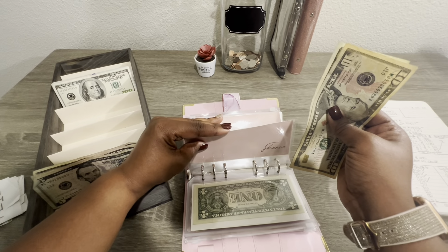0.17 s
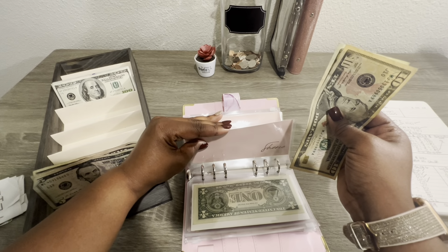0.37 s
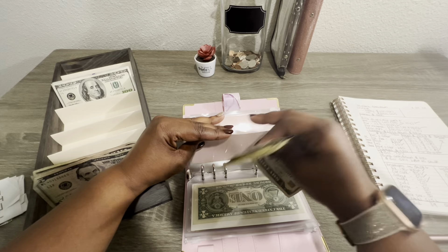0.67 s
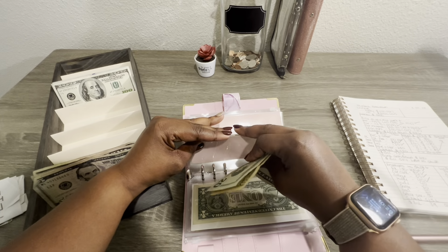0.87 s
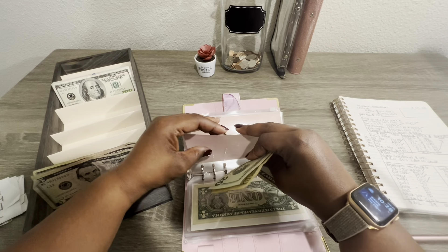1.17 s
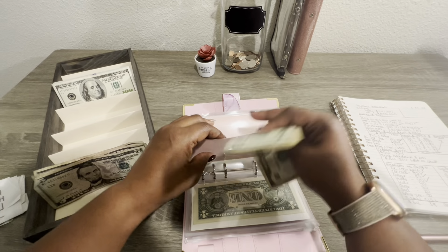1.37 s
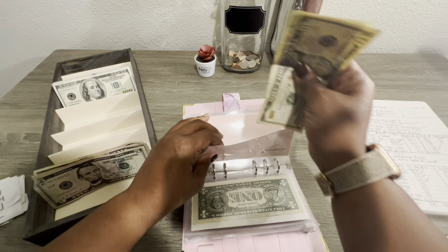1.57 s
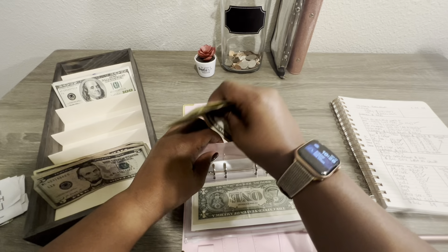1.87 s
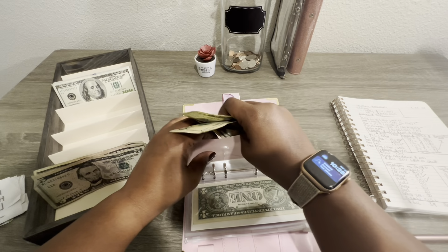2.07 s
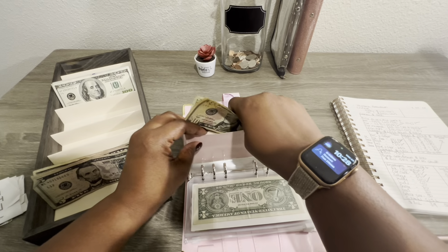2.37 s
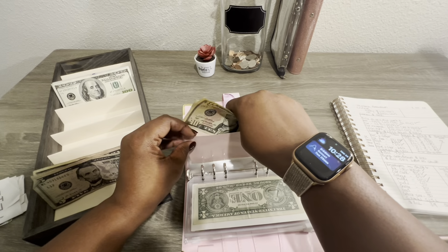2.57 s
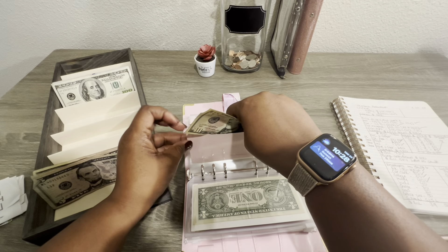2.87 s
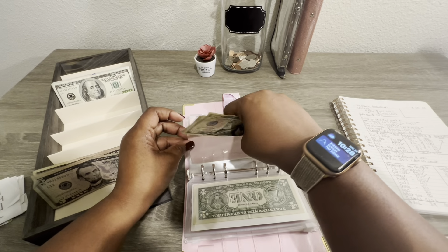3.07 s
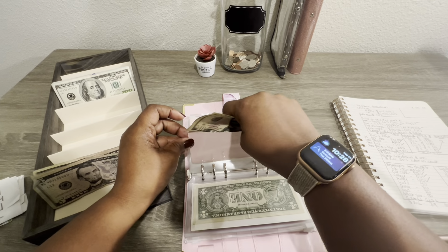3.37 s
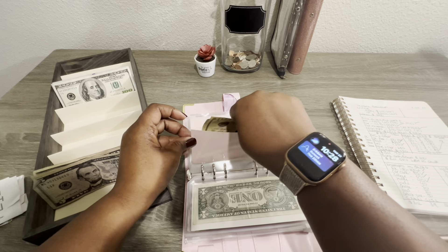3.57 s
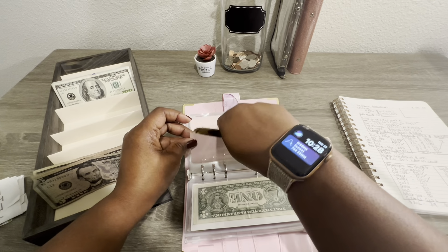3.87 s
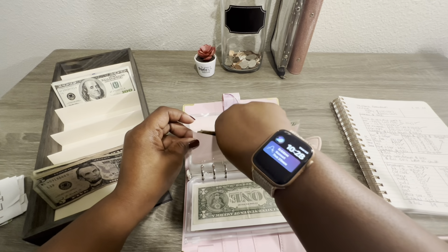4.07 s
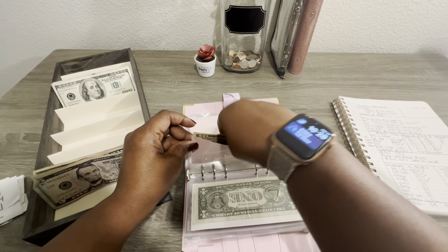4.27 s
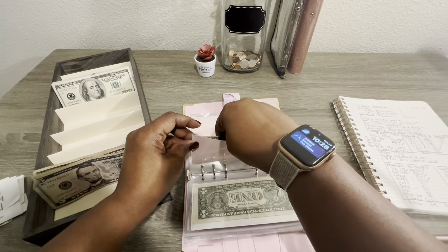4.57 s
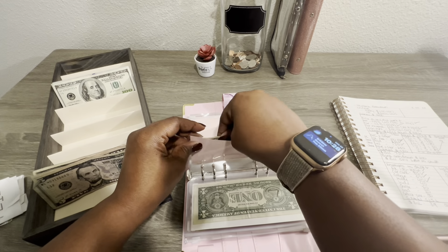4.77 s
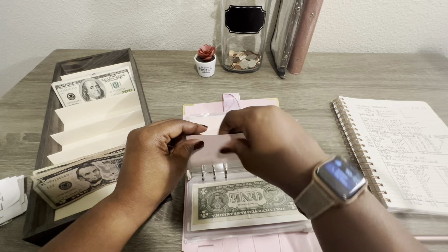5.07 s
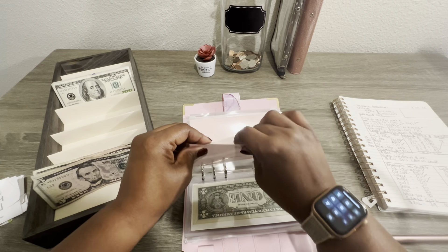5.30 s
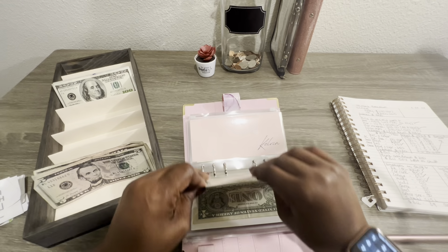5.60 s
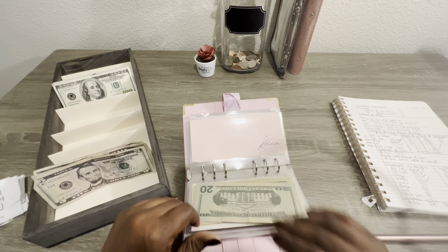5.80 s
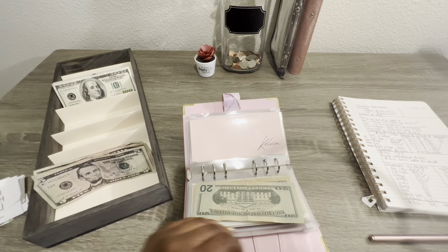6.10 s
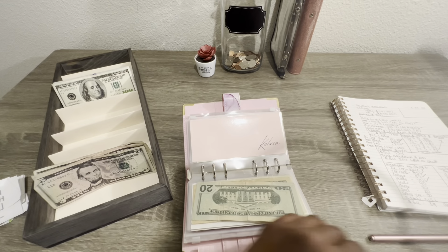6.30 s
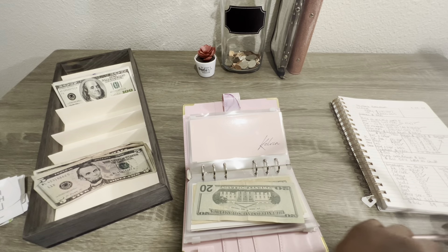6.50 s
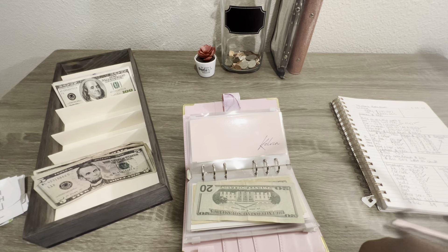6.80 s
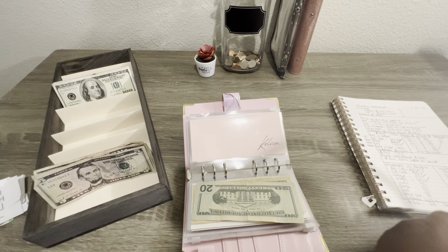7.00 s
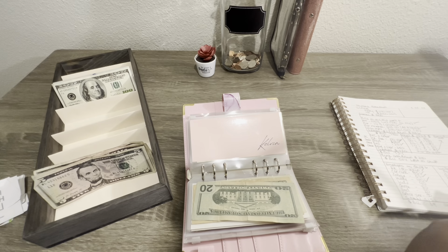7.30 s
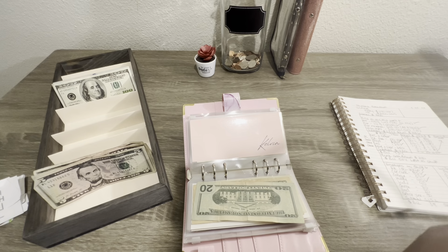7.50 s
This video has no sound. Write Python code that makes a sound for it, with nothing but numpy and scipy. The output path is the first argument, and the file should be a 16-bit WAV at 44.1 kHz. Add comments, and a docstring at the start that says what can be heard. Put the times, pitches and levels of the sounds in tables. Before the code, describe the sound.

A low, slightly wavering hum and soft rush of air, the hiss brighter on the left, continue throughout a small, fairly dry room. Right at the start paper scrapes briefly. At about 0.5 s a sharp, hollow knock on the binder lands with a soft desk thump; a lighter rub follows at 0.8 s and a cluster of muted bumps at 1.3 s. From 1.9 to 5.4 s banknotes are pushed into a plastic sleeve: close, uneven strokes of dry hiss, fine crackle, crisp creases and little clicks, with stronger snaps around 4.25 s. At 5.4 to 5.8 s come soft thumps and a short papery slide, then gentle brushing around 6.1 s. At 6.6 to 6.85 s a pen taps and rattles rapidly on the wood with a dull thud beneath. The hum remains, broken by a small tick and rub at 7.4 s.

```python
"""First comes a brief scrape of paper over a low hum and a steady rush of air, brighter at the left port.
Banknotes are slid into a plastic envelope of a ring binder on a wooden desk, close under a two-port microphone.
Friction is banded noise with grains of crackle; creases are bursts of noise; knocks and pen taps strike
damped modes, and landings strike those of the desk. Sines make the appliance's hum, shaped noise the air."""
import sys
import numpy as np
from scipy import signal
from scipy.fft import rfft, irfft, next_fast_len
from scipy.io import wavfile

SR = 44100
rng = np.random.default_rng(int(sys.argv[2]) if len(sys.argv) > 2 else 0)


def waveform_to_disk(signal):
    """Save audio, clipped to [-1, 1], as 16-bit WAV at the path in sys.argv[1]."""
    frames = np.transpose(np.atleast_2d(signal))
    scaled = np.clip(frames, -1, 1) * 32767
    samples = np.round(scaled).astype(np.int16)
    wavfile.write(sys.argv[1], SR, samples)


N = 337359   # samples
SIZE = next_fast_len(N + SR // 2)   # transform length, with space for the room tail
HZ = np.arange(SIZE // 2 + 1) * SR / SIZE

# Spectrum of the air in the room: (frequency [Hz], left level [dB per Hz], right level [dB per Hz],
# shared fraction of power [0-1], lead of the right port [rad])
AIR_SPECTRUM = [(30.2, -90, -90, 0.7, 2), (50.3, -86, -89, 1, 0.5), (89, -78.5, -98, 0.97, 0),
                (135.6, -77.5, -72.5, 0.97, 0.37), (187.4, -80.5, -87.5, 1, 1),
                (244, -72.5, -70.5, 0.57, 1), (339.5, -79, -77.5, 0.63, 1), (553, -92, -91, 0.82, 3.5),
                (1040, -92, -94.5, 0.63, 3.5), (1914, -90.5, -101, 0.63, 0.5), (2105, -106, -107, 0.6, 8.5),
                (3930, -105, -115, 0, 13.5), (6900, -104, -118, 0.8, -10), (9300, -116, -113, 0.6, 3.5),
                (11200, -132, -128, .8, 9.5), (15500, -136, -136, 1, 0)]
# Air resonances: (frequency [Hz], width [Hz], left level [dB], right level [dB])
AIR_RESONANCES = [(1610, 333, -60.5, -103), (7290, 700, -68, -102)]
# Appliance tones: (frequency [Hz], left level [dB], right level [dB], lead of the right port [rad],
# spread of the level's wavering [dB])
HUM_TONES = [(120.2, -59, -60, .2, 2.5), (261, -70, -55, 1.5, 2), (1184, -74, -76, 2.0, 1.5)]
# Level points of a fluctuating low tone near 59 Hz, one arbitrary course, midway between the ports:
# (time [s], level [dB])
LOW_TONE_LEVELS = [(0.0, -59), (0.04, -58), (1.53, -73), (1.7, -64), (2.75, -57.5), (4.05, -80),
                   (4.17, -63), (5.26, -59), (6.35, -62.5), (6.39, -71), (7.63, -55), (7.65, -57)]
# Wrists and binder landing softly on the desk: (time [s], level before the thud gain [dB])
LANDINGS = [(0.538, -37), (1.324, -38), (5.45, -38.5), (5.834, -43.5), (6.129, -51), (6.597, -33.5),
            (6.724, -48)]
# Modes of the desk: (frequency [Hz], level [dB], decay time t60 [s])
DESK_MODES = [(83, -1.5, 0.23), (120, -3, 0.88), (170, -6, 0.18)]
# Modes of the binder, struck freely: (frequency [Hz], level [dB], decay time t60 [s])
BINDER_MODES = [(300, -3, 0.046), (446, -6, 0.019), (541, -3.5, 0.055), (650, -1, 0.03), (848, -7.5, 0.023),
                (1002, -3, 0.027), (1168, -1, 0.031), (1490, -9.5, 0.048), (2300, -11, 0.0054),
                (1750, -16, 0.052), (2780, -8, 0.017), (3060, -14, 0.041)]
# The pen is set down and rattles on the desk: (time [s], level [dB])
PEN_BLOWS = [(6.581, -44.5), (6.5879, -38), (6.599, -38), (6.604, -49), (6.645, -50), (6.66, -48.5),
             (6.692, -48), (6.703, -50), (6.717, -39.5), (6.7225, -41), (6.728, -44), (6.74, -48),
             (6.754, -45), (6.768, -42.5), (6.776, -43), (6.789, -44), (6.808, -51), (6.857, -52)]
# Modes of the pen: (frequency [Hz], level [dB], decay time t60 [s])
PEN_MODES = [(314, -1.5, 0.043), (440, -2.5, 0.049), (610, -12, 0.028), (1070, -2, 0.053), (1182, -6, 0.05),
             (1520, -5, 0.05), (1766, -7.5, 0.039), (2070, -15, 0.032), (2530, -19.5, 0.035),
             (3410, -6, .035), (4380, -26, .03), (5300, -24, .035)]
# Short coloured puffs of noise, narrow or broad, from rubs, knocks and the pen:
# (start [s], length [s], frequency [Hz], width [Hz], level [dB])
PUFFS = [(0.536, 0.0073, 1260, 500, -26.5), (0.535, 0.0088, 3070, 350, -32.5),
         (0.5356, 0.0041, 6850, 1200, -49), (0.572, 0.059, 1255, 150, -49.5),
         (0.639, 0.0069, 5470, 1600, -49), (1.295, 0.0072, 1440, 400, -54), (1.322, .012, 574, 200, -39),
         (1.323, 0.0093, 990, 200, -47), (2.615, .006, 5500, 2500, -55), (2.857, .01, 2300, 300, -54),
         (4.244, .006, 2840, 400, -41), (4.039, 0.055, 2500, 900, -59), (4.44, .04, 2600, 900, -63),
         (4.611, 0.0046, 2500, 1200, -53), (6.077, 0.096, 4530, 1400, -59), (1.326, 0.0089, 2680, 300, -51),
         (3.09, .025, 6050, 250, -62), (3.143, 0.01, 6100, 400, -57.5), (3.159, .012, 2230, 200, -51.5),
         (3.291, 0.0063, 6160, 400, -49.5), (3.289, .008, 2530, 300, -49.5), (3.31, .02, 1490, 200, -52),
         (3.326, .01, 2430, 300, -55), (3.341, .01, 2130, 350, -52), (4.898, 0.014, 2800, 300, -55),
         (4.978, 0.0088, 2370, 250, -51), (5.295, 0.013, 2500, 250, -61), (5.329, .012, 3200, 400, -55),
         (5.396, 0.013, 1070, 200, -45), (6.063, 0.01, 5000, 3500, -53), (6.601, 0.007, 1520, 250, -42),
         (6.722, .015, 5470, 400, -71), (6.753, 0.035, 5320, 120, -65), (6.786, .01, 5300, 200, -60),
         (6.745, .015, 3400, 200, -60), (6.722, 0.051, 9300, 500, -70), (7.3775, 0.0061, 9400, 1500, -54)]
# Creases and knocks: (time [s], crack level before its gain and band-pass [dB], crisp top re crack [dB],
# knock on the binder [dB], hardness of the knock [dB per octave])
CREASES = [(0.013, -50, 4, -55, -1), (.515, -55, -8, -44.5, -12), (.566, -56, -10, -40, -7.5),
           (0.5358, -29, -4, -21, 0.5), (.538, -60, -10, -27, -9), (0.639, -51, 4.5, -48, 2.5),
           (0.8004, -37, -7, -42, -1), (0.976, -49, -25.5, -59, 8.5), (1.095, -44.5, -1, -50, -7),
           (1.298, -43.5, -10, -53, -6), (1.304, -62, -11, -45, -9), (1.3222, -40, -7, -35.5, -6),
           (1.333, -63, -12, -37, -4), (1.345, -60, -12, -43, -1), (1.3593, -59, -20, -60, 1),
           (1.461, -47, -5, -44, -1), (1.9435, -40.5, 1, -38, -5.5), (2.1007, -34, -30, -32.5, -3.5),
           (2.198, -47, -7, -46, -7), (2.4174, -44, 10.5, -42, -5), (2.57, -52, -21, -43, -5),
           (2.616, -54.5, 14, -67, -2), (2.685, -37.5, -16, -41.5, 2.5), (2.7395, -43, -4, -47, 3),
           (2.762, -52, -10, -55, 3), (2.8584, -46.5, -1, -50, 2.5), (3.0407, -42.5, -3, -46, 0),
           (3.044, -55, -8, -43, -3), (3.118, -62, -4, -44, -7), (3.166, -48, -4, -43, -4),
           (3.2735, -48, -15, -40.5, -7), (3.2941, -43, -8, -42.5, 1.5), (3.382, -52, 0, -39, -2),
           (3.392, -42, 1, -41, 1), (3.4235, -60, -9.5, -43, 0), (3.857, -48, -19, -67, -17),
           (3.991, -62.5, -16, -58, -12), (4.2466, -34, -20, -48, 4), (4.2734, -31, -14, -49, 4),
           (4.3006, -41.5, 4, -49, -10), (4.6112, -53, -30, -48.5, 2), (4.6546, -39.5, -15, -49.5, -1),
           (4.677, -50.5, 6.5, -57, 0), (4.899, -48, -8, -57, 6), (4.9785, -39, -6, -54, 3),
           (5.2183, -41, -23, -50, -11), (5.3045, -53, -22, -57, -2), (5.394, -44, -8, -45, 1),
           (5.436, -48, -13, -41.5, -4), (5.5175, -50, -12, -65, 4), (5.7282, -45, 3.5, -56, 5.5),
           (5.775, -40, 0, -63, -0.5), (6.061, -50, -4, -68, 0.1), (6.582, -51, -13.5, -48, 1.5),
           (6.596, -44, -15, -48, 3.5), (6.714, -59, -7, -49, 2), (7.378, -44, -5, -54.5, 4),
           (7.383, -53, -2, -66, 0)]
# Strokes of paper on plastic, of hands on the binder and, from 6.6 s, of the pen; levels before the layer gains:
# (peak time [s], swell [s per 10 dB], fade [s per 10 dB], mean hiss level [dB], upper re lower hiss [dB],
# crisp top re mean hiss [dB], low binder modes [dB], high binder modes [dB])
RUB_STROKES = [(0.015, -0.5, -0.06, -55.5, 25, -16, -58, -61),
               (0.534, -0.16, 0.11, -50.5, 5, -12, -55, -54), (.58, 0.08, 0.11, -64, -5, -23, -58, -53),
               (0.799, -0.11, 0.01, -54.5, 10, -19, -59, -56),
               (.97, 0.18, -0.08, -60.5, 0, -23, -59, -59.5), (1.11, 0.8, 1.2, -70, 5, -18, -63, -70),
               (1.33, 0.08, 0.13, -58.5, -1, -13, -55, -58), (1.468, 0, 0.02, -54, -4, -9, -53, -60),
               (1.52, -0.6, -0.3, -65.5, 12, -12, -76, -70), (1.88, 0.005, 0.3, -62, -3, -3, -58, -65),
               (1.95, 0.04, 0.17, -54, 6, -4, -50.5, -57), (2.05, 0.06, 0.16, -56, 10, -1.5, -70, -70),
               (2.11, 0.03, .15, -53.5, 1, -4.5, -60, -57.5),
               (2.25, 0.04, 0.12, -61.5, -0.5, -3.5, -54, -60),
               (2.35, 0.03, 0.24, -61, -3, -9.5, -63, -62.5), (2.43, 0.14, 0.2, -66, 0, 2.5, -57, -65),
               (2.625, 0.005, 0.005, -72, 1, -1.5, -54, -66), (2.68, 0.07, 0.14, -61, 3, -8, -55, -60),
               (2.754, -0.04, 0.03, -51.5, -2, -6, -51.5, -53), (2.87, -0.26, 0, -60, -2, -12, -63, -65),
               (3.04, 0.06, 0.3, -59, 1, -9, -53.5, -59), (3.16, 0.035, 0.02, -50.5, -2, -5.5, -56, -56),
               (3.21, .04, 0.02, -60, -10, -10, -58, -57), (3.298, 0.012, 0.15, -50.5, -1, -8, -49, -52),
               (3.395, 0.03, 0.12, -52.5, 3.5, -4.5, -52, -55),
               (3.52, 0.05, 0.4, -61.5, -2.5, -6.5, -60, -63.5),
               (3.68, 0.05, 0.1, -58, 0, -8.5, -55, -59.5), (3.752, 0.08, 0.03, -59, -2, -9, -53.5, -57),
               (3.885, 0.05, .05, -55, -1, -10, -55, -61), (3.93, 0.1, 0.035, -55.5, 4, -11, -54.5, -62),
               (4.08, .065, 0.1, -53, -5, -8.5, -53.5, -52.5),
               (4.285, 0.005, 0.03, -51.5, 4, -13, -58, -57.5), (4.36, 0.2, 0.06, -56, 0, -9, -58, -61),
               (4.445, 0.04, 0.16, -56, -3, -8, -55.5, -56), (4.67, 0.01, 0.15, -58.5, -1.5, -7, -70, -65),
               (4.82, 0.06, 0.38, -60.5, -7.5, -12, -65.5, -61.5),
               (4.9, 0.02, 0.07, -57.5, 0, -7.5, -59, -67), (4.72, .03, .05, -60, -3, -10, -62, -58),
               (4.977, 0.045, 0.03, -52, 0, -7, -54.5, -57), (5.08, 0.05, .04, -58, 5, -6, -60, -65),
               (5.15, 0.24, 0.06, -62, 5, -4, -58.5, -61), (5.22, .015, 0.03, -53.5, -5, -18, -63, -52),
               (5.32, .02, 0.03, -55, -2, -9, -53, -56.5), (5.4, 0.07, .015, -54, 4, -8, -62, -59),
               (5.44, 0.13, 0.02, -60, 5, -12, -62, -58), (5.52, 0.1, 0.1, -62, 3, -10, -74, -62),
               (5.72, 0.06, 0.11, -64.5, 5, -5, -78, -64), (5.779, 0.07, 0.07, -56, 3, -12, -64, -54),
               (5.92, 0.12, 0.14, -66, 10, -21, -74, -73), (6.063, 0.004, 0.17, -58.5, 6, -19, -70, -62),
               (6.35, 0.17, -0.19, -62, 3, -27, -74, -63), (6.6, 0.04, 0.18, -64, -1, -21, -68.5, -52),
               (6.645, 0.04, 0.23, -68, -4, -25, -58, -56.5), (6.721, 0.0252, 0.03, -62, -4, -6, -49, -43),
               (6.77, 0.18, 0.03, -56, -3, -19, -59, -55), (7.04, 0, 1, -75, -2, -8.5, -80, -71),
               (7.38, -0.12, 0.04, -62, 0, -12, -80.5, -60.5)]
# Hands at rest, one level [dB] each: lower hiss, upper hiss, crisp top, low and high binder modes
REST_LEVELS = [-89, -92, -104, -66, -68.5]
# Hands as the two ports hear them, before the right port's gain: (frequency [Hz], left level [dB],
# right level [dB], shared fraction of power [0-1], lead of the right port [rad])
HAND_TRANSFER = [(98, -3.5, -8, 0.8, -0.5), (356, 3.5, 4, 0.5, 0.85), (720, -1.5, -2, 0.17, 0),
                 (1400, 3, -1.5, 0.26, -1), (2460, 2, 0, 0.8, -1.5), (3730, -3, -7, 0.12, -3.5),
                 (6500, 5, -5.5, 0.03, 1), (8680, 3, 4, 0.12, 0), (10160, 0.5, 0.5, 0.96, 3),
                 (12600, 0.5, -1.5, 1, 7.5), (15500, -4.5, -5, 1, 12.5)]

LOW_TONE_HZ, LOW_TONE_LEAD_RAD = 59, -.3   # the right port leads by this phase
LOW_TONE_LEFT_DB = 2.5   # left above and right below the tabled level
ROOM_T60_S, ROOM_DB = .25, -20
PUFF_EDGE_S, PUFF_FALL_DB = 0.00083, -9   # rise time, and level one length after the start
CRACK_T60_S = 0.033
TICK_DB, TICK_SAMPLES = 3, 30   # the first instant of a crack is sharper than its tail
CRINKLES_PER_S, CRINKLE_CYCLES = 250, 45   # median rate; cycles until a facet has decayed by 60 dB
CRINKLE_DB = -10.5   # re the mean of the lower and upper hiss levels
CLUMP_DB, CLUMPS_PER_S = 4, 40   # spread and drift rate of the density of grains and crinkles
GRAINS_PER_S, GRAIN_SPREAD_DB, GRAIN_DB = 900, 1.5, -4.5   # median rate, mean excess size, level re friction
FLUTTER_DB, FLUTTER_PER_S = 1.5, 60
PATCHY_DB = 0.4   # lower and upper hiss flicker apart
TOP_STEEPER, BINDER_STEEPER = 1.62, 1   # slope of swell and fade in dB, relative to the hiss
STOPBAND_HZ = 16377


def from_db(db):
    """Level and amplitude: 20 dB is a factor of ten."""
    return 10 ** (np.asarray(db) / 20)


def rms_one(x):
    """Normalization: division by the root mean square gives unit power."""
    return x / np.sqrt(np.mean(x ** 2) + 1e-20)


def drift(rate):
    """Slow random fluctuation: noise twice through a one-pole low-pass at rate [Hz] has spread 1."""
    pole = np.exp(-80 * np.pi * rate / SR)   # one step spans 40 samples
    noise = rng.standard_normal(N // 40 + 2002)
    slow = signal.lfilter([1], [1, -2 * pole, pole * pole], noise)[2000:]
    return np.interp(np.arange(N) / 40, np.arange(len(slow)), rms_one(slow))


def band(x, low_hz, high_hz):
    """Band-pass filtering: only frequencies between two edges pass freely."""
    return signal.sosfilt(signal.butter(2, [low_hz, high_hz], "band", fs=SR, output="sos"), x)


def mode(x, hz, t60):
    """Damped resonance: a unit click excites a decaying sine of initial height 1."""
    r = from_db(-60 / (t60 * SR))
    w = 2 * np.pi * hz / SR
    return signal.lfilter([0, np.sin(w)], [1, -2 * r * np.cos(w), r * r], x)


def ring(times, levels_db, tilts_db, modes, contact_s):
    """Modal excitation: each blow makes three uneven contacts; a harder one favours the high modes."""
    out = np.zeros(N)
    at = np.round(times * SR).astype(int)
    chance_db = rng.normal(0, 1.8, (len(at), len(modes), 3))
    for k, (hz, level_db, t60) in enumerate(modes):
        blows = np.full(N, 1e-18)   # tiny offset keeps the filter out of vanishing numbers
        tilt_db = tilts_db * np.log2(hz / 600)
        for j in range(3):
            size_db = levels_db + level_db + tilt_db - 9.1 * j + chance_db[:, k, j]
            blows[at + round(j * contact_s * SR)] += from_db(size_db)
        out += (-1) ** k * mode(blows, hz, t60)   # neighbouring modes start in opposite phase
    return out


def ports(shared, own, table):
    """Partial coherence: both ports hear a shared sound, the right phase-shifted, plus a part of its own each."""
    hz, *columns = np.transpose(table)
    left_db, right_db, alike, lead = [np.interp(np.log(HZ + 1), np.log(hz), c) for c in columns]
    alike = np.clip(alike, 0, 1)
    both = rfft(shared, SIZE) * np.array([np.ones(len(HZ)), np.exp(1j * lead)])
    mix = np.sqrt(alike) * both + np.sqrt(1 - alike) * rfft(own, SIZE)
    return irfft(mix * from_db([left_db, right_db]), SIZE)[:, :N]


def air_rush():
    """Broadband noise and resonance: shaped white noise gains two bands of raised level."""
    white = rng.standard_normal((3, N)) * np.sqrt(SR / 2)   # unit power per Hz
    out = ports(white[0], white[1:], AIR_SPECTRUM)
    for hz, width_hz, left_db, right_db in AIR_RESONANCES:
        rush = rms_one(band(rng.standard_normal(N), hz - width_hz / 2, hz + width_hz / 2))
        out += rush * from_db([[left_db], [right_db]])
    return out


def hum_tone(hz, lead, wander_hz):
    """Steady oscillation: a sine of unit power whose phase wanders, with a phase lead at the right port."""
    phase = 2 * np.pi * hz * np.arange(N) / SR + .5 * drift(wander_hz)
    return np.sqrt(2) * np.sin(phase + np.array([[0], [lead]]))


def appliance_hum():
    """Superposition of tones: the sines waver in level by chance, a low one follows its level points."""
    out = np.zeros((2, N))
    for hz, left_db, right_db, lead, waver_db in HUM_TONES:
        level_db = np.array([[left_db], [right_db]]) + waver_db * drift(2.0)
        out += hum_tone(hz, lead, 0.76) * from_db(level_db)
    low_db = np.interp(np.arange(N) / SR, *np.transpose(LOW_TONE_LEVELS))
    balance_db = LOW_TONE_LEFT_DB * np.array([[1], [-1]])
    return out + hum_tone(LOW_TONE_HZ, LOW_TONE_LEAD_RAD, 0.73) * from_db(low_db + balance_db)


def room_tail(x):
    """Diffuse reverberation: convolution with decaying noise, unrelated at the two ports."""
    t = np.arange(SR // 3) / SR
    tail = band(rng.standard_normal((2, len(t))), 120, 3800)
    tail *= from_db(-60 * t / ROOM_T60_S) * (t > .004)
    tail /= np.sqrt(np.sum(tail ** 2, axis=1, keepdims=True))
    return from_db(ROOM_DB) * irfft(rfft(x, SIZE) * rfft(tail, SIZE), SIZE)[:, :N]


def desk_thuds():
    """Low modal excitation: soft landings set the modes of the desk ringing."""
    s, level_db = np.transpose(LANDINGS)
    return band(ring(s, level_db - 6, 0, DESK_MODES, contact_s=0.0036), 54, 195)


def pen_rattle():
    """Repeated impact: quick taps set the modes of the pen ringing."""
    s, level_db = np.transpose(PEN_BLOWS)
    return ring(s, level_db, 0, PEN_MODES, contact_s=0.00158)


def binder_knocks():
    """Impact of fingers: each knock sets the modes of the binder ringing."""
    s, _, _, knock_db, hardness_db = np.transpose(CREASES)
    return ring(s + 0.001004, knock_db, hardness_db, BINDER_MODES, contact_s=0.00137)


def coloured_puffs():
    """Band-passed noise: short puffs colour the rubs, knocks and pen sounds."""
    out = np.zeros((3, N + 6000))
    t = np.arange(6000) / SR
    for s, length, hz, width_hz, db in PUFFS:
        shape = np.minimum(t / PUFF_EDGE_S, 1) * from_db(PUFF_FALL_DB * (t / max(length, .002)) ** 2)
        puff = shape * band(rng.standard_normal((3, 6000)), hz - width_hz / 2, hz + width_hz / 2)
        size = np.sqrt(np.sum(shape ** 2) / np.sum(puff ** 2, axis=1, keepdims=True))
        start = round(s * SR)
        out[:, start:start + 6000] += puff * size * from_db(db)
    return out[:, :N]


def snaps():
    """Sudden release: a crease lets go as a burst of noise that dies within milliseconds, its top first."""
    crack, top = np.zeros((3, N + 4000)), np.zeros((3, N + 4000))
    fall_db = -60 * np.arange(4000) / SR / CRACK_T60_S
    for s, crack_db, top_db, _, _ in CREASES:
        burst = rng.standard_normal((3, 4000))
        burst[:, :TICK_SAMPLES] *= from_db(TICK_DB)
        i = round(s * SR)
        crack[:, i:i + 4000] += burst * from_db(crack_db + 1.5 + fall_db)
        top[:, i:i + 4000] += burst * from_db(crack_db + top_db + 1.77 * fall_db)
    return band(crack[:, :N], 1980, 5000) - band(top[:, :N], 9800, 21500)


def crinkles():
    """Buckling: small facets flip in uneven clumps, each ringing at its pitch within about two octaves."""
    sizes = from_db(3 * np.minimum(rng.exponential(1, N), 3)) * rng.choice([-1, 1], N)
    born = rng.random(N) < CRINKLES_PER_S * from_db(CLUMP_DB * drift(CLUMPS_PER_S)) / SR
    facet = rng.integers(0, 16, N)
    out = np.zeros(N)
    for k, hz in enumerate(np.geomspace(2100, 9000, 16)):
        flips = sizes * born * (facet == k) + 1e-18
        out += mode(flips, hz, CRINKLE_CYCLES / hz)
    return rms_one(out)


def strokes():
    """Addition of powers: strokes swell and fade, giving the levels [dB] of the five layers of rubbing."""
    t = np.arange(0, N + 64, 64) / SR
    s, swell, fade, hiss_db, sheen_db, top_db, low_db, high_db = np.transpose(RUB_STROKES)[:, :, None]
    # swells and fades below 3 ms per 10 dB, negative ones too, count as 3 ms
    before = (s - t) / np.maximum(swell, .003)
    after = (t - s) / np.maximum(fade, .003)
    below_db = -10 * np.maximum(before, after)
    layers_db = [hiss_db - sheen_db / 2 + below_db,
                 hiss_db + sheen_db / 2 + below_db,
                 hiss_db + top_db + TOP_STEEPER * below_db,
                 low_db + BINDER_STEEPER * below_db,
                 high_db + BINDER_STEEPER * below_db]
    levels = []
    for db, rest_db in zip(layers_db, REST_LEVELS):
        power = np.sum(from_db(db) ** 2, axis=0) + from_db(rest_db) ** 2
        levels.append(np.interp(np.arange(N) / SR, t, 10 * np.log10(power)))
    return levels


def friction_noise():
    """Dry friction: fluttering hiss plus clumped crackle, in three voices sharing one motion."""
    sizes = from_db(GRAIN_SPREAD_DB * np.minimum(rng.exponential(1, N), 4))
    grains = sizes * (rng.random(N) < GRAINS_PER_S * from_db(CLUMP_DB * drift(CLUMPS_PER_S)) / SR)
    bursts = signal.lfilter([1], [1, -.94], grains)   # each fibre lets go in under a millisecond
    crackle = rms_one(bursts * rng.standard_normal((3, N)))
    hiss = rng.standard_normal((3, N)) * from_db(FLUTTER_DB * drift(FLUTTER_PER_S))
    return hiss + from_db(GRAIN_DB) * crackle


def rubbing(dull_db, bright_db, top_db, low_db, high_db):
    """Friction as a driving force: it sounds from the sheet in bands and excites the damped binder."""
    sheet = friction_noise()
    # the hands damp the binder while they rub it, so its modes ring shorter
    low = sum(from_db(db) * mode(sheet, hz, 0.32 * t60) for hz, db, t60 in BINDER_MODES if hz < 800)
    high = sum(from_db(db) * mode(sheet, hz, 0.38 * t60) for hz, db, t60 in BINDER_MODES if 800 <= hz < 2000)
    body = from_db(low_db - 2.5) * rms_one(band(low, 298, 1240))
    body = body + from_db(high_db + 0.85) * rms_one(high)
    dull = from_db(dull_db + 6.5 + PATCHY_DB * drift(16)) * band(sheet, 2040, 3750)
    bright = from_db(bright_db + PATCHY_DB * drift(30)) * band(sheet, 3600, 6950)
    top = from_db(top_db + 6) * band(sheet, 9600, 21500)
    crinkle = from_db((dull_db + bright_db) / 2 + CRINKLE_DB) * crinkles() * [[1], [.6], [-.6]]
    # neighbouring hiss bands meet in opposite phase, so their signs alternate
    return body + crinkle + dull - bright + top


def scene():
    """Superposition: hands, desk and room add up at the two ports."""
    # three voices: shared, the left port's own, the right port's own
    knocks = (binder_knocks() + pen_rattle()) * [[1.2], [.3], [-.3]]
    paper = rubbing(*strokes()) + snaps() + coloured_puffs() + knocks
    hands = ports(paper[0], paper[1:], HAND_TRANSFER) * from_db([[0.0], [1.5]])
    thuds = desk_thuds() * from_db([[1.5], [-1.5]])
    return air_rush() + appliance_hum() + room_tail(paper[0]) + thuds + hands


def record(dry):
    """Low-pass filtering: a steep filter cuts the top, 50 dB down from the stopband edge."""
    return signal.sosfilt(signal.cheby2(14, 50, STOPBAND_HZ, fs=SR, output="sos"), dry)


dry = scene()
out = record(dry)
waveform_to_disk(out)
```